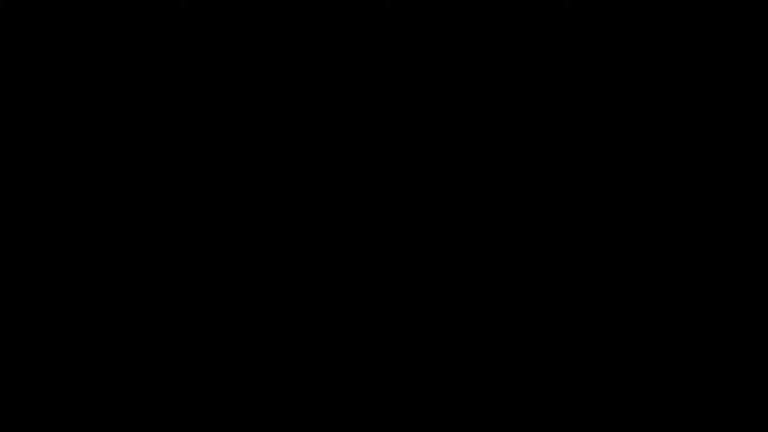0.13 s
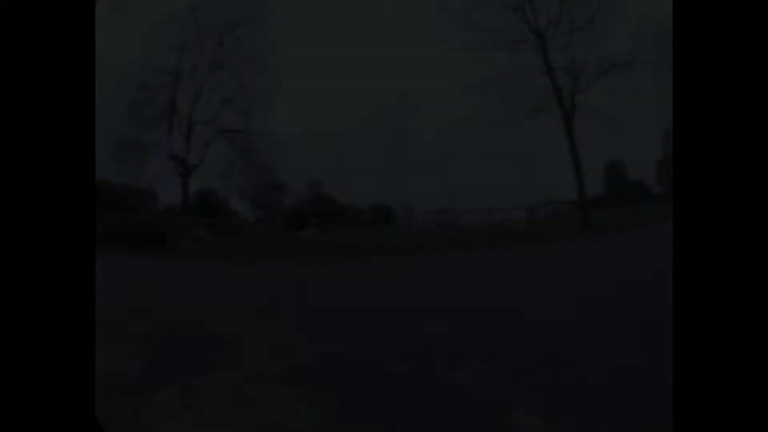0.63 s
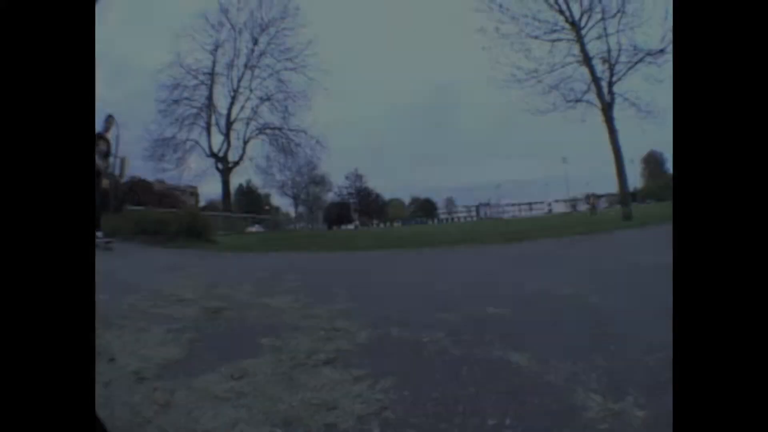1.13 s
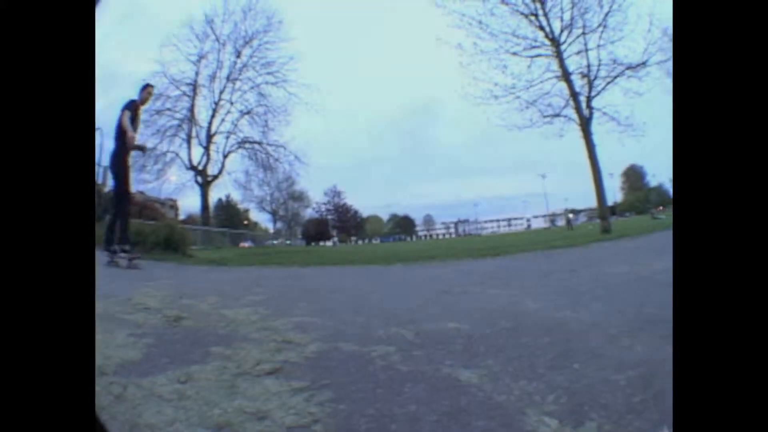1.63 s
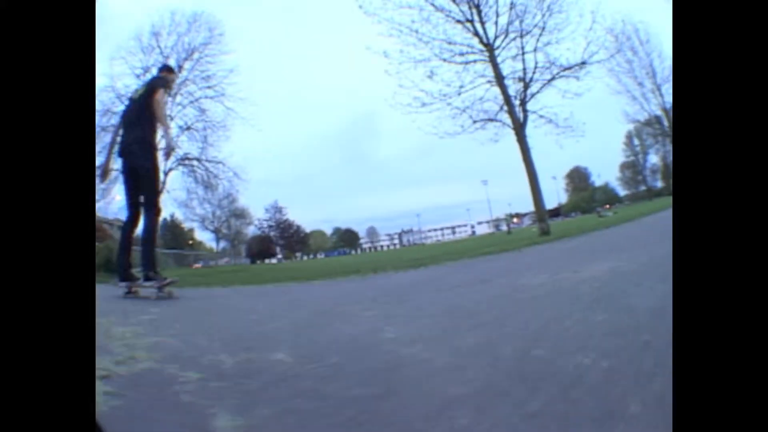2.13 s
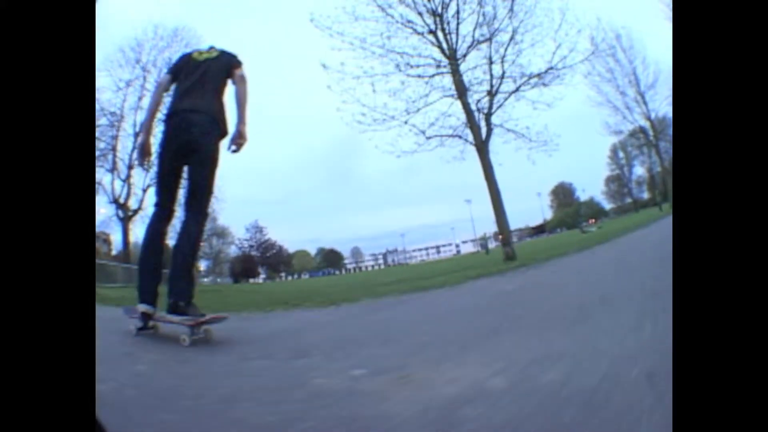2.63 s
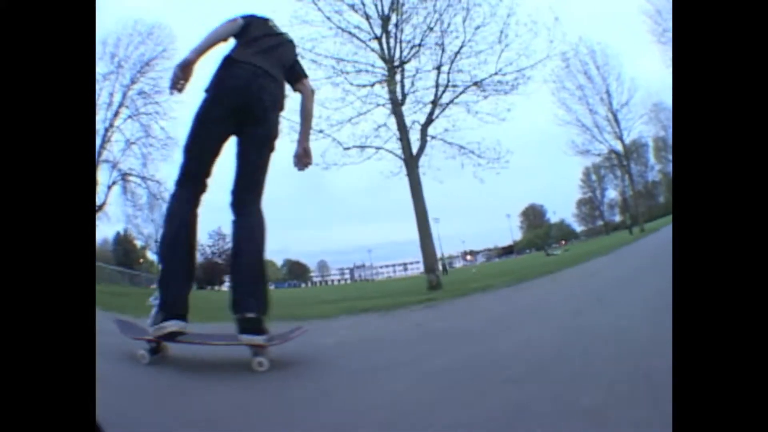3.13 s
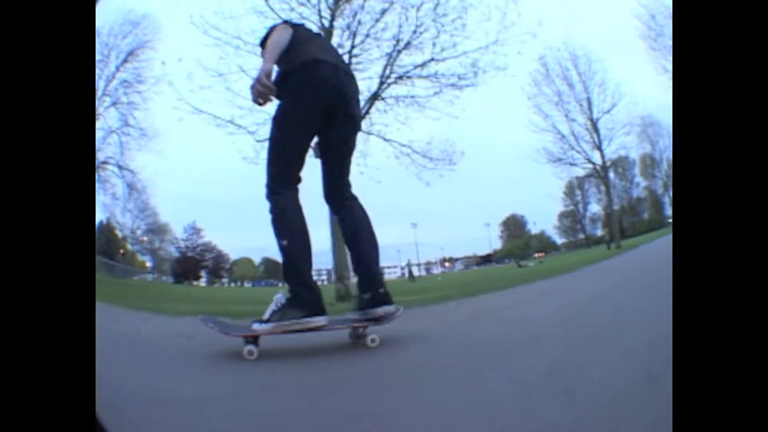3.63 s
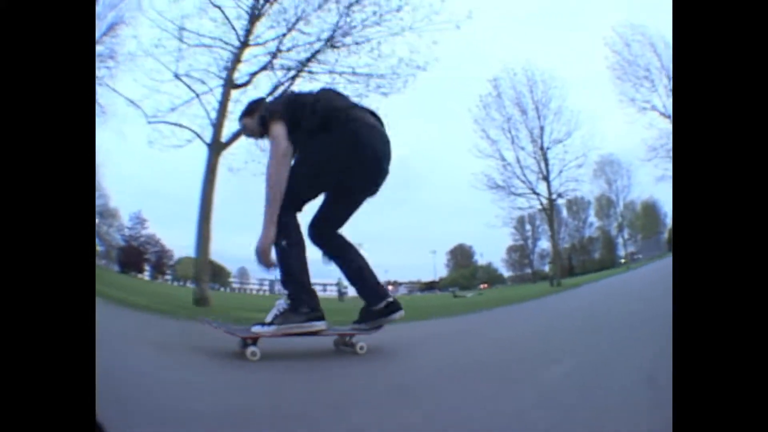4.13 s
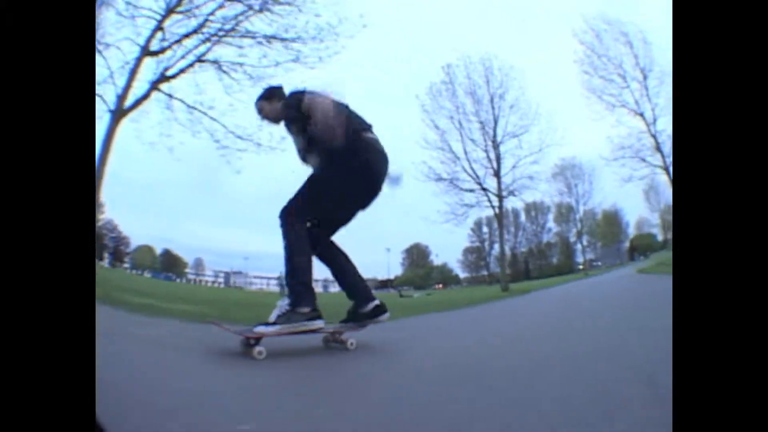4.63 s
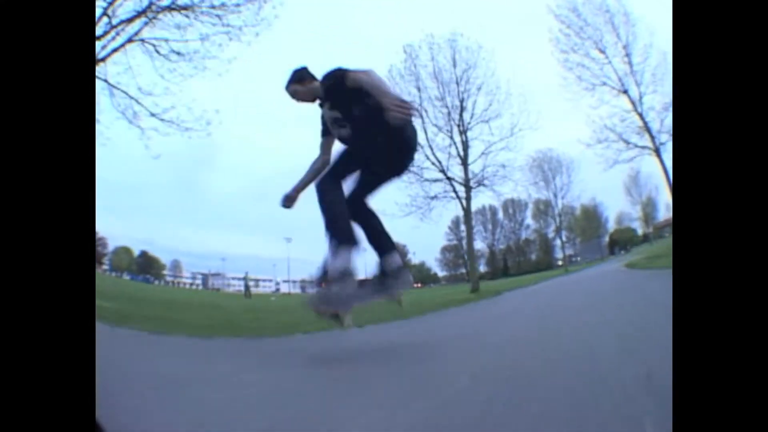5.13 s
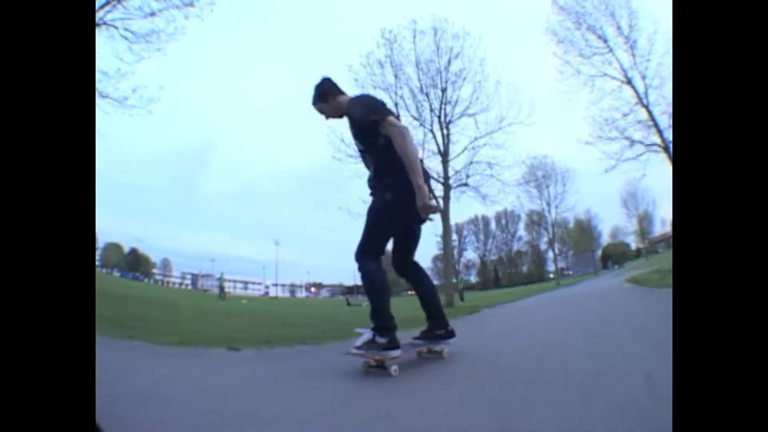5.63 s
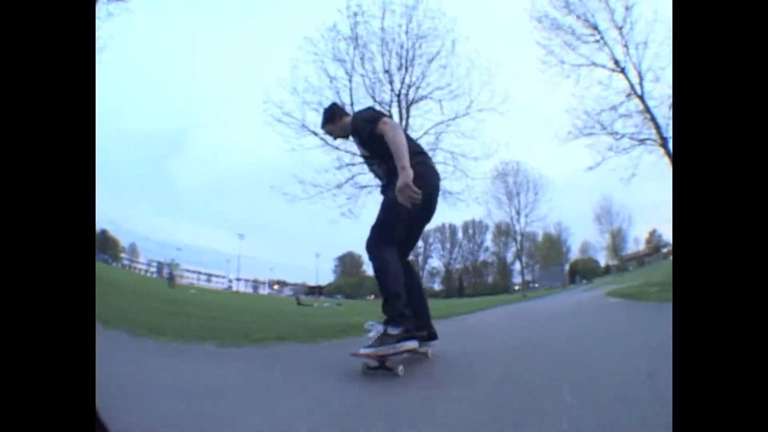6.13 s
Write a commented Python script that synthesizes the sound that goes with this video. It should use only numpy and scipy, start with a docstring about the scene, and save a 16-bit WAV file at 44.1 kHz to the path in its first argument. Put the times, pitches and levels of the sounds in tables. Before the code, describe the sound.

After a short silence, distant traffic fades in outdoors and a skateboard approaches from the left on rough asphalt. Stones tick and knock under its wheels, swelling to a loud, close, hollow rumble with rattling trucks. The tail scrapes and pops sharply; rolling stops during the flight, then a double clack and heavy wooden landing lead into softer rolling. A low stereo microphone stays close, with light wind and rounded loud peaks.

```python
"""On rough asphalt, a skateboard rolls in from the left, pops into the air, lands and rolls on.
Grit under four wheels drives noise bands and ringing filters for deck, trucks and rattle.
Stones, tail and landing are short grainy pushes that ring the same parts; some hits have their own pitch.
Far traffic, a low drone and wind are filtered noise. All begins in silence, and the traffic fades in."""
import sys
import numpy as np
from scipy import signal
from scipy.fft import rfft, irfft
from scipy.io import wavfile
from scipy.ndimage import map_coordinates

SR = 44100
rng = np.random.default_rng(int(sys.argv[2]) if len(sys.argv) > 2 else 0)


def store_pcm(level_fs):
    """Save levels as 16-bit WAV."""
    pcm = np.round(np.clip(level_fs, -1, 1) * 32767).astype(np.int16)
    wavfile.write(sys.argv[1], SR, np.atleast_2d(pcm).T)


def to_linear_factor(level_db):
    """Convert decibel levels (scalar or array-like) to linear amplitude factors."""
    exponent = np.asarray(level_db, float) / 20
    return 10 ** exponent


N = 276066

# Base levels of the board rolling in: [t/s, deck level/dB, low thrum level/dB,
# wheel growl level/dB, rattle level/dB]
ROLL_IN = [(0.5, -110, -90, -119, -131), (0.61, -67, -66, -62, -80), (0.69, -65, -53, -59.5, -66),
           (0.95, -52, -48.5, -50.5, -55.5), (1.14, -53, -43, -45, -49), (1.34, -47, -45.5, -56, -58.5),
           (1.56, -43, -35.5, -42.5, -51.5), (1.7, -50, -47, -35.5, -45.5), (1.78, -35, -27, -35, -46),
           (1.93, -36.5, -31.5, -33, -44), (2.2, -36, -29, -33, -45), (2.81, -35, -26.5, -30, -40),
           (2.92, -15.5, -16, -16.5, -23), (3.031, -17.5, -21.5, -21.5, -26),
           (3.5, -15, -21.5, -26.5, -35.5), (3.68, -20, -21.5, -24, -38.5), (3.88, -20, -25, -30, -41.5),
           (4.21, -18, -21.5, -24.5, -35.5), (4.39, -21, -23, -32, -43), (4.55, -28, -27.5, -28.5, -42),
           (4.76, -35, -34, -43, -48.5)]
# The same columns after the landing
ROLL_AWAY = [(5.322, -27, -34, -28, -33), (5.394, -26.5, -22, -29.5, -42), (5.464, -28, -28, -47, -43.5),
             (5.55, -41, -28.5, -31, -50.5), (5.66, -34, -28, -32, -47), (5.784, -30.5, -28.5, -29.5, -43),
             (5.956, -32, -32, -37.5, -47.5), (6.26, -28, -27.5, -36.5, -43.5)]
# rolling sound is silent between these: tail scrape, pop, flight and first landing touch
ROLL_STOPS_S, ROLL_RESUMES_S = 4.8, 5.31
# Path of the board: [t/s, lead of the left port/samples, spread of that lead over the wheels/samples,
# treble shading between the ports/dB]
PATH = [(.42, 6.04, 0.11, 1.5), (1.4, 5.9, 0.54, 3), (2.0, 5.4, 0.71, 2.5), (2.6, 4.3, 1.1, 3.5),
        (3.2, 3.45, 1.46, 2.5), (3.6, 1.8, 1.1, 2.5), (4.5, 1.1, 2.3, 2), (4.88, 1.4, 1.1, 3.5),
        (5.0, 0.27, 0.94, 1.5), (6.26, 0.066, 0.21, 1)]
# Places of the four wheels along the board: [multiple of the spread]
WHEEL_PLACES = np.array([-1.5, -.5, .5, 1.5])

# Colours of the rolling layers, each scaled to rms 1 when used: [f/Hz, level/dB per Hz]
BOOM_COLOUR = [(80, -37), (115, 5), (140, 10), (175, 10.5), (260, -33)]
THRUM_COLOUR = [(130, -13.5), (200, 1), (260, 4), (330, 4), (420, -2.5), (500, 1), (650, -30)]
GROWL_COLOUR = [(600, -4), (880, 8), (1100, 4.5), (1300, 2.5), (1600, 3.5), (2300, -29.5)]
BUZZ_COLOUR = [(1100, 4), (1600, 19), (1900, 11.5), (2500, -3.5), (3000, 3.5), (4300, -39.5)]
RATTLE_COLOUR = [(2200, 6), (3300, -2.5), (4400, 2), (5300, 1), (5900, 1), (6500, -4.5), (9000, -4.5),
                 (11500, -11.5), (13500, -20.5), (15000, -52)]

# Main bending of the deck as the rider shifts weight: [t/s, f/Hz, width of one filter pass/Hz]
DECK_BEND = [(.42, 690, 300), (2.4, 610, 383), (2.9, 606, 260), (3.08, 625, 199), (3.22, 540, 181),
             (3.34, 600, 204), (3.48, 550, 185), (3.68, 687, 203), (3.8, 656, 201), (3.9, 702, 129),
             (4.15, 670, 171), (4.4, 718, 142), (4.6, 640, 306), (4.75, 630, 353), (5.4, 540, 392),
             (6.26, 600, 403)]
# Upper bending of the deck: [t/s, level against the growl/dB, f/Hz]
UPPER_BEND = [(.42, -16, 1010), (1.6, -13.5, 950), (2.5, -10, 990), (2.75, -13, 880), (2.9, -8.5, 870),
              (3.1, -22, 880), (3.5, -16, 845), (3.68, -10, 860), (3.85, -13, 940), (4.25, -7, 1150),
              (4.38, 1, 1170), (4.5, 1.5, 1240), (4.62, 0, 1140), (4.72, -12, 1100), (5.35, -7, 1050),
              (5.8, -8, 1070), (6.26, -4, 1050)]
UPPER_BEND_WIDTH_HZ = 240   # of one filter pass
# Low boom: [t/s, level against the thrum/dB]
BOOM_LEVEL = [(.42, -5), (1.7, -5.5), (2.7, -8.5), (3.6, -4.5), (4.15, -5), (4.45, -11), (4.7, -12),
              (5.4, -14.5), (6.26, -7.5)]
BUZZ_DB = -8   # truck buzz against the growl
AXLE_HZ, AXLE_WIDTH_HZ = 2155, 190
# Faint ring of the axles: [t/s, level against the growl/dB]
AXLE_LEVEL = [(.42, -23), (3.2, -24), (3.7, -10.5), (4.2, -17), (4.4, -24), (6.26, -28)]
BEARINGS_HZ, BEARINGS_WIDTH_HZ = 5850, 380
# Hiss of the bearings: [t/s, level against the rattle/dB]
BEARINGS_LEVEL = [(.42, -8), (1.7, -8), (2.6, -11), (3.0, -20), (5.6, -20), (5.85, -12), (6.26, -12)]
TOP_HZ = 10500   # corner above which the next table acts
# Boost or cut of the highest rattle: [t/s, level/dB]
TOP_LEVEL = [(.42, -8), (1.3, 1.5), (2.2, -1), (4.2, -1), (4.8, -3), (5.3, -10), (6.26, -10)]
WANDER_DB, WANDER_PER_S = 2, 2.25   # changing asphalt shifts the balance of the layers
BLOWS_PER_S, BLOWS_DB = 110, -3.5   # coarse stones for each wheel; level against the grit
FLASH, FLASH_MS = 0.67, 6.9   # each blow shakes the rattle briefly: share, fall time
CRACKLE_PER_S, CRACKLE_CYCLES, CRACKLE_DB = 260, 6.4, -6   # grains per wheel; level against the rattle

# Stones, pop and first touch of the landing, peaks before panning:
# [t/s, crack level/dB, thud level/dB, snap level/dB]
KNOCKS = [(0.8024, -49, -31, -41), (0.8229, -38, -27, -35), (0.9727, -27, -24.5, -28),
          (1.1518, -39, -28, -43), (1.3157, -28, -24.5, -30), (1.6182, -42, -37, -27),
          (1.6718, -43, -27, -23), (1.954, -21.5, -39, -25), (1.967, -28, -27, -28),
          (1.9875, -21, -17, -28), (2.1252, -23, -26, -25), (2.1405, -22, -4.5, -15),
          (2.278, -22, -13.5, -18), (2.3183, -13, -12, -27), (2.4368, -22, -20, -18),
          (2.5391, -16, -10, -35), (2.6376, -43, -35, -47), (2.6953, -17, -16, -42),
          (2.7285, -11.5, -19, -37), (2.8534, -11, -17, -12), (2.938, -4.5, -25, -28),
          (3.1635, -10.5, -13, -13), (3.2223, -14, -13, -31), (3.267, -12, -33, -28),
          (3.2849, -7, -30, -29), (3.3264, -7, -12, -27), (3.3704, -10, -23, -9.5), (3.418, -18, -8, -8),
          (3.4381, -18, -22, -11.5), (3.4843, -15, -6.5, -14), (3.509, -19.5, -27, -15),
          (3.7868, -10, -8.5, -19), (4.0115, -30, -17, -30), (4.037, -19, -19, -21), (4.1051, -14, -9, -16),
          (4.14, -25, -12, -35), (4.2585, -38, -17, -40), (4.4684, -30, -10, -45), (4.9053, -1, -6, -27),
          (5.213, -3, -12, -11.5), (5.4464, -16, -11, -19), (5.478, -27, -16, -28), (5.522, -30, -29, -36),
          (5.5939, -23, -17, -25), (5.6246, -20.5, -16, -23.5), (5.6793, -27, -20, -28),
          (5.7717, -22, -40, -20), (5.904, -15, -4.5, -22), (5.926, -11.5, -11, -15),
          (6.0926, -30, -20, -32), (6.1, -25, -30, -26), (6.115, -22, -19, -23), (6.152, -23, -26, -24),
          (6.17, -20, -10.5, -18.5), (6.2132, -16, -21, -23)]
KNOCK_CONTACT_MS, KNOCK_T60_MS, KNOCK_THUMP_DB = 0.36, 48.6, -9.5   # all knocks; thump against thud
# Rough patches, tail drag, shoe on grip and landing, peaks before panning: [t/s, contact/ms,
# 60 dB fall of the push/ms, crack level/dB, thump level/dB, thud level/dB, snap level/dB]
GRINDS = [(0.977, 20, 160, -34, -45, -30.5, -30), (1.08, 54, 60, -37, -45, -33, -36.5),
          (1.63, 8.2, 23, -26, -41, -27, -26.5), (1.729, 11, 56, -21.5, -33, -17, -21.5),
          (2.03, 20, 71, -20.5, -23, -17, -26), (2.39, 340, 120, -10.5, -13.5, -8, -16.5),
          (2.742, 72, 410, -14, -9.5, -3, -12.5), (2.772, 27, 130, -3, -34, -37, -9.5),
          (4.742, 14, 67, -28, -20, -18, -28), (4.768, 108, 120, -14.5, -8, -6, -13),
          (4.908, 13.7, 97, -15, -12, -12, -8.5), (4.939, 40, 170, -22.5, -41, -50.5, -19.5),
          (5.22, 13.5, 156, -13.5, -29, -13, -16.5), (5.279, 9.7, 27, -11, -27, -15, -21),
          (5.302, 12.7, 24, -4, -2.5, -7, -7.5), (5.345, 21, 44, -19.5, -17, -27, -20),
          (5.398, 12, 45, -22, -20, -22, -28), (5.415, 21.4, 57, -14, -17, -15.5, -22),
          (5.552, 13, 35, -19, -24, -14, -27), (5.785, 80, 70, -22.5, -25, -25, -26.5),
          (5.991, 28, 40, -16, -34, -14, -18.5)]
# Pitched sounds of stones, tail scrape, pop, landing and rolling, with one faint long shudder in the air,
# peaks before panning: [t/s, level/dB, f/Hz, width/Hz, contact/ms]
PINGS = [(1.14, -28, 735, 150, 14), (1.155, -28, 1050, 150, 10), (1.668, -19.5, 900, 200, 11),
         (1.79, -29, 890, 150, 8), (1.905, -19, 940, 200, 32), (2.64, -20, 900, 400, 2),
         (2.728, -13.5, 1340, 300, 2.2), (1.672, -27, 5960, 900, 2.1), (1.957, -25.5, 6540, 1500, 8),
         (2.106, -33, 3600, 600, 1.5), (2.126, -21, 2470, 300, 12), (2.14, -11.5, 2380, 400, 2),
         (2.138, -6.5, 1160, 320, 4), (2.767, -11, 4400, 800, 30), (2.776, -4, 2470, 800, 36),
         (2.9949, -13, 2500, 900, 1.5), (3.0854, -13, 3000, 1500, 1.5), (3.738, -33, 7800, 2500, 1.5),
         (3.7866, -1.5, 4800, 1090, 0.43), (4.0115, -9.5, 734, 200, 2), (4.015, -23, 2120, 250, 6),
         (4.2585, -14, 710, 250, 1.6), (4.468, -16, 920, 400, 1.5), (3.3705, -6, 650, 249, 2.3),
         (4.0128, -22, 8500, 2000, 4), (4.259, -34, 4300, 1500, 1.5), (4.404, -23, 4200, 1500, 1.55),
         (4.584, -25.5, 8000, 2500, 2.5), (4.59, -24, 4970, 1200, 2.9), (4.637, -21, 7940, 1800, 1.15),
         (4.6915, -24.5, 4980, 3000, 2.6), (4.62, -29, 5000, 1500, 3.3), (4.775, -8, 255, 170, 120),
         (4.9057, 5, 2880, 2180, 0.29), (4.9057, -5, 1287, 110, 3.2), (4.912, -5, 1110, 260, 10),
         (4.921, -9, 1250, 250, 6), (4.908, -14, 467, 90, 15), (4.907, -12, 2190, 250, 6.5),
         (5.07, -33.5, 2170, 1390, 150), (5.222, -15, 1300, 500, 25), (2.772, -8, 3270, 3000, 32),
         (2.765, -8, 900, 450, 35), (5.3025, -8, 260, 160, 15), (5.214, -14, 420, 250, 12),
         (0.8, -36, 690, 160, 50), (5.2137, -9, 2840, 900, 0.52), (5.2135, -9.5, 620, 151, 1.4),
         (5.3015, 1.5, 684, 199, 18.6), (5.302, -8, 430, 149, 16), (5.302, -19.5, 110, 70, 7),
         (5.903, -7.5, 2230, 500, 1), (5.903, -22, 1020, 180, 1.3), (5.926, -14, 1090, 250, 3.6),
         (5.994, -8.5, 946, 130, 16), (6.01, -9, 970, 160, 9.5), (5.993, -20, 2720, 300, 22),
         (6.008, -19, 1760, 250, 15), (6, -19.5, 5030, 900, 24)]
PAN_DB_PER_SAMPLE = 1.6   # hits are louder at the port that leads
# Time when hits come from the right, beside the microphone: [start t/s, end t/s]
RIGHT_SIDE_TIME = (2.1, 2.33)

# Struck deck, low bending: [f/Hz, width/Hz, level/dB]
PLANK_MODES = [(219, 81, 2), (297, 180, 1.5)]
# Struck deck, high bending: [f/Hz, width/Hz, level/dB]
DECK_MODES = [(600, 278, 3.5), (872, 246, 5), (1144, 298, -2.5)]
# Struck trucks: [f/Hz, width/Hz, level/dB]
TRUCK_MODES = [(1380, 500, -3.5), (1887, 480, 3), (2038, 430, 1.5), (2830, 855, -4), (3150, 1280, -8.5)]

# Colour of far traffic, scaled to rms 1 when used: [f/Hz, level/dB per Hz]
TRAFFIC_COLOUR = [(90, -6), (130, 6.5), (250, 2.5), (500, 4), (800, 2.5), (1100, 0), (1600, -12.5),
                  (2600, -17.5), (3600, -24.5), (6000, -25.5), (9000, -32.5), (13000, -47)]
TRAFFIC_DB = -31.5   # once faded in
# Fade-in of the traffic; its first moment ends the silence for all sources: [t/s, level/dB]
FADE = [(.42, -58), (.445, -34), (.55, -24), (1.0, -14), (1.6, -6), (2.2, 0)]
# Colour of the low drone, scaled to rms 1 when used: [f/Hz, level/dB per Hz]
DRONE_COLOUR = [(80, -20), (92, -7), (103, 0), (116, -5), (135, -9), (165, -22)]
# Low drone: [t/s, level/dB]
DRONE_LEVEL = [(.42, -77), (.7, -59), (1.15, -41.5), (1.9, -35), (2.3, -27.5), (2.6, -39), (3.1, -37),
               (3.7, -43.5), (4.7, -37), (5.0, -48.5), (6.26, -40)]
# Wind on the ports, before gusts: [t/s, level/dB]
WIND_LEVEL = [(.42, -76), (.7, -54), (1.2, -49), (2.0, -44.5), (2.8, -36), (3.6, -40.5), (4.6, -40.5),
              (5.3, -44), (6.26, -51)]


def rms_one(x):
    """Scale to unit rms."""
    return x / np.sqrt(np.mean(x ** 2) + 1e-20)


def in_time(rows):
    """Turn table columns into curves over every sample."""
    s, *columns = np.transpose(rows)
    return [np.interp(np.arange(N) / SR, s, c) for c in columns]


def colour(x, spectrum, size=2048):
    """Minimum-phase filter with this spectrum, steep outside it: nothing sounds early; rms 1."""
    (first_hz, first_db), (last_hz, last_db) = spectrum[0], spectrum[-1]
    hz, db = np.transpose([(first_hz / 4, first_db - 30), *spectrum, (last_hz * 4, last_db - 60)])
    grid = np.maximum(np.arange(size // 2 + 1), .5) * SR / size
    log_gain = np.interp(np.log(grid), np.log(hz), db) * np.log(10) / 20
    # folding the cepstrum onto positive times packs the energy at the start
    cepstrum = irfft(log_gain)
    cepstrum[1:size // 2] *= 2
    cepstrum[size // 2 + 1:] = 0
    response = irfft(np.exp(rfft(cepstrum)))
    return rms_one(signal.oaconvolve(x, response[None], axes=-1)[:, :x.shape[1]])


def resonance(hz, width_hz):
    """Two-pole resonance with gain 1 on top."""
    r = np.exp(-np.pi * width_hz / SR)
    return (1 - r * r) / 2 * np.array([1, 0, -1]), [1, -2 * r * np.cos(2 * np.pi * hz / SR), r * r]


def body(x, modes):
    """A struck part: side-by-side resonances with alternating signs."""
    return sum((-1) ** k * to_linear_factor(db) * signal.lfilter(*resonance(hz, width), x)
               for k, (hz, width, db) in enumerate(modes))


def drift(rate, count=1):
    """Smoothed random wander of spread 1, computed at every eighth sample."""
    r = np.exp(-16 * np.pi * rate / SR)
    noise = rng.standard_normal((count, N // 8 + 4001))
    slow = signal.lfilter([1], [1, -2 * r, r * r], noise)[:, 4000:]   # skip the filter's start
    return np.repeat(rms_one(slow), 8, axis=1)[:, :N]


def high_part(x, corner_hz):
    """Gentle high-pass: the treble of a sound."""
    return signal.sosfilt(signal.butter(1, corner_hz, "high", fs=SR, output="sos"), x)


def roll(low_db=0.61, mid_db=1.43):
    """Four wheels reach two ports, each with its own lag; level differences in dB per sample of lead."""
    quiet = [[s] + [-90] * 4 for s in (FADE[0][0], ROLL_STOPS_S, ROLL_RESUMES_S)]
    deck_db, thrum_db, growl_db, rattle_db = in_time([quiet[0], *ROLL_IN, *quiet[1:], *ROLL_AWAY])
    wander_db = WANDER_DB * drift(WANDER_PER_S, count=2)
    lead, spread, shading_db = in_time(PATH)
    # bumps shake all wheels, jolts shake one, chatter passes quick blows through the whole board
    shakes = drift(23.0), drift(22.0, count=4), drift(77)
    coarse, fine = grit(2500, spread_db=4.0), grit(3500, spread_db=4.5)
    blows = rms_one(np.abs(grit(BLOWS_PER_S, spread_db=1.6)))   # coarse stones all push the same way
    coarse = rms_one(coarse) + to_linear_factor(BLOWS_DB) * blows
    flashes = rms_one(signal.lfilter([1], [1, -np.exp(-1000 / (FLASH_MS * SR))], blows))
    fine = rms_one(fine) * (1 + FLASH * flashes)
    low = deck_rumble(coarse, blows, deck_db, thrum_db, wander_db[0], shakes)
    mid = truck_growl(coarse, growl_db, wander_db[1], shakes)
    rattle = loose_rattle(fine, rattle_db, shakes)
    out = np.zeros((2, N))
    for port, side in enumerate((.5, -.5)):
        mix = low * to_linear_factor(side * low_db * lead) + mid * to_linear_factor(side * mid_db * lead)
        mix = mix + shade(rattle, side * shading_db)
        for wheel, place in zip(mix, WHEEL_PLACES):
            read_at = np.arange(N) + side * (lead + spread * place)
            out[port] += map_coordinates(wheel, [read_at], order=3, mode="nearest") / 2
    return out


def grit(per_s, spread_db):
    """Each wheel meets stones at random, with sizes drawn from an exponential spread in dB."""
    sizes = to_linear_factor(spread_db * np.minimum(rng.exponential(1, (4, N)), 4)) * rng.choice([-1, 1], (4, N))
    return sizes * (rng.random((4, N)) < per_s / SR) + 1e-18


def deck_rumble(coarse, blows, deck_db, thrum_db, wander_db, shakes):
    """Grit pushes the deck: a boom, a thrum and the main bending ring."""
    bumps, jolts, chatter = shakes
    boom_db = thrum_db + in_time(BOOM_LEVEL)[0] + wander_db
    low = to_linear_factor(boom_db) * colour(coarse, BOOM_COLOUR, size=4096)
    low = low + to_linear_factor(thrum_db + 2.0 * bumps) * colour(coarse, THRUM_COLOUR)
    push = rms_one(grit(2500, spread_db=3.5)) + to_linear_factor(BLOWS_DB) * blows
    ring = deck_ring(push, *in_time(DECK_BEND))
    return low + to_linear_factor(deck_db + 1.16 * chatter + 0.4 * bumps + 0.5 * jolts) * ring


def deck_ring(x, ring_hz, width_hz, size=512):
    """A bending mode, applied twice for steep flanks, block by block as its pitch moves."""
    out, state = x.copy(), np.zeros((2, len(x), 2))
    for i in range(0, N, size):
        block = slice(i, i + size)
        filter_now = resonance(ring_hz[i], max(width_hz[i], 30))
        for turn in range(2):
            out[:, block], state[turn] = signal.lfilter(*filter_now, out[:, block], zi=state[turn])
    return rms_one(out)


def truck_growl(coarse, growl_db, wander_db, shakes):
    """Grit drives wheel growl, truck buzz, upper deck bending and axle ring; lone stones tick."""
    bumps, jolts, chatter = shakes
    buzz_db = growl_db + BUZZ_DB + wander_db
    bend_db, bend_hz = in_time(UPPER_BEND)
    mid = to_linear_factor(growl_db + 1.5 * chatter + 0.87 * bumps + 2.0 * jolts) * colour(coarse, GROWL_COLOUR)
    mid = mid + to_linear_factor(buzz_db + 2.4 * chatter + 1.4 * bumps + 1.2 * jolts) * colour(coarse, BUZZ_COLOUR)
    bend = deck_ring(coarse, bend_hz, np.full(N, UPPER_BEND_WIDTH_HZ))
    mid = mid + to_linear_factor(growl_db + bend_db + 0.83 * bumps + 1.4 * chatter) * bend
    axle = rms_one(body(coarse, [(AXLE_HZ, AXLE_WIDTH_HZ, 0)]))
    mid = mid + to_linear_factor(growl_db + in_time(AXLE_LEVEL)[0] + 2.0 * chatter) * axle
    stones = signal.lfilter([1], [1, -.6], grit(24, spread_db=-4.0))   # lone stones tick in the trucks
    return mid + to_linear_factor(buzz_db - 15) * rms_one(body(stones, TRUCK_MODES))


def loose_rattle(fine, rattle_db, shakes):
    """Fine grit rattles the trucks, joined by crackle and the narrow hiss of the bearings."""
    bumps, jolts, chatter = shakes
    rattle = to_linear_factor(rattle_db + 1.84 * chatter + 0.6 * bumps + 1.8 * jolts) * colour(fine, RATTLE_COLOUR)
    rattle = rattle + to_linear_factor(rattle_db + CRACKLE_DB) * crackle()
    hiss = rms_one(body(fine, [(BEARINGS_HZ, BEARINGS_WIDTH_HZ, 0)]))
    rattle = rattle + to_linear_factor(rattle_db + in_time(BEARINGS_LEVEL)[0]) * hiss
    return rattle + (to_linear_factor(in_time(TOP_LEVEL)[0]) - 1) * high_part(rattle, TOP_HZ)


def crackle(low_hz=1500, high_hz=9000, tilt_db=-3.5, count=10):
    """Crushed grit snaps in clumps, dealt to short rings spread in pitch; tilt in dB per octave."""
    snaps = grit(CRACKLE_PER_S, spread_db=7.5) * to_linear_factor(0.87 * drift(31.0))
    dealt = rng.integers(0, count, (4, N))
    total = 0
    for k, hz in enumerate(np.geomspace(low_hz, high_hz, count)):
        mode = (hz, 1.6 * hz / CRACKLE_CYCLES, tilt_db * np.log2(hz / low_hz))
        total = total + body(snaps * (dealt == k) + 1e-18, [mode])
    return rms_one(total)


def shade(x, db, top_share=3.17, corner_hz=7000):
    """The housing shades a port from the far side, more so in the top octave."""
    return to_linear_factor(db) * (x + (to_linear_factor(top_share * db) - 1) * high_part(x, corner_hz))


def hits():
    """Short knocks and long grinds, each placed where the board is."""
    pan = PAN_DB_PER_SAMPLE * hit_lead()
    short = [(s, crack, thud + KNOCK_THUMP_DB, thud, snap, pan[int(s * SR)], KNOCK_CONTACT_MS, KNOCK_T60_MS)
             for s, crack, thud, snap in KNOCKS]
    long = [(s, crack, thump, thud, snap, pan[int(s * SR)], contact, t60)
            for s, contact, t60, crack, thump, thud, snap in GRINDS]
    return (knocks(short, first_touch=10.3, rise=0.099, grain_db=0.0)
            + knocks(long, first_touch=0.26, rise=0.76, grain_db=2.5))


def knocks(table, first_touch, rise, grain_db, low_pan=0.18, apart=1.0, snap_touch=1.0,
           snap_fall=0.13, snap_pan=1.46, size=7000):
    """A first touch, a grainy contact, then a fast fall; deck, trucks and snap ring together."""
    out, ms = np.zeros((2, N + size + 20)), np.arange(size) / SR * 1000
    grain_size = to_linear_factor(grain_db * rng.standard_normal((len(table), 1, size // 140)).repeat(140, axis=2))
    grain = rng.standard_normal((len(table), 3, size)) * grain_size
    for (s, crack_db, thump_db, thud_db, snap_db, pan_db, contact, t60), noise in zip(table, grain):
        fall_db = -60 * np.maximum(ms - contact, 0)
        push = to_linear_factor(fall_db / max(t60, 3)) * noise
        push *= np.clip(0.46 + (contact < 20) + ms / (rise * contact), 0, 1)   # long contacts swell
        push[0, 0] = first_touch
        thump, thud, crack = (peak_one(body(push[0], modes))
                              for modes in (PLANK_MODES, DECK_MODES, TRUCK_MODES))
        push[0, 0] *= snap_touch   # share of the first touch passed to the treble
        # the treble dies sooner, and has noise of its own at each port
        snap_push = (push[0] + apart * push[1:]) * to_linear_factor(snap_fall * fall_db / max(t60, 3))
        snap = colour(snap_push, RATTLE_COLOUR)
        for port, side in enumerate((.5, -.5)):
            at = round(s * SR - side * np.clip(pan_db, -6, 6))   # one sample of lead per dB
            low = to_linear_factor(thump_db) * thump + to_linear_factor(thud_db) * thud
            snap_level = to_linear_factor(snap_db + side * (snap_pan - 1.5) * pan_db)
            high = to_linear_factor(crack_db) * crack + snap_level * peak_one(snap[port])
            out[port, at:at + size] += to_linear_factor(side * low_pan * pan_db) * low + to_linear_factor(side * pan_db) * high
    return out[:, :N]


def peak_one(x):
    """Scale to a peak of 1."""
    return x / np.abs(x).max()


def pings(size=7000):
    """A swelling and fading grainy contact drives one pitch through two resonances in a row."""
    out, ms, lead = np.zeros((2, N + size + 20)), np.arange(size) / SR * 1000, hit_lead()
    for (s, db, hz, width, contact), noise in zip(PINGS, rng.standard_normal((len(PINGS), size))):
        swell = np.sqrt(np.sin(np.pi * np.clip((ms + 0.025) / contact, 0, 1)) ** 2)
        sound = peak_one(body(body(noise * swell, [(hz, width, 0)]), [(hz, 3 * width, 0)]))
        lead_now = lead[int(s * SR)]
        pan_db = PAN_DB_PER_SAMPLE * lead_now * min(hz / 2000, 1)   # low pitches differ less
        for port, side in enumerate((.5, -.5)):
            at = round(s * SR - side * lead_now)
            out[port, at:at + size] += to_linear_factor(db + side * pan_db) * sound
    return out[:, :N]


def hit_lead(right_lead=-2.8):
    """Lead of the left port, in samples, for a hit at each moment."""
    s = np.arange(N) / SR
    on_right = (s > RIGHT_SIDE_TIME[0]) & (s < RIGHT_SIDE_TIME[1])
    return np.where(on_right, right_lead, in_time(PATH)[0])


def surroundings():
    """The background at both ports: traffic, drone and wind."""
    return traffic() + drone() + wind()


def traffic(apart=0.067):
    """Far traffic is coloured noise, nearly the same at both ports, with a fluttering level."""
    noise = rng.standard_normal((3, N))
    level_db = TRAFFIC_DB + in_time(FADE)[0] + .8 * drift(25)
    return colour(noise[0] + apart * noise[1:], TRAFFIC_COLOUR) * to_linear_factor(level_db)


def drone():
    """The low drone is a narrow band of noise common to both ports."""
    noise = rng.standard_normal((1, N))
    return colour(noise, DRONE_COLOUR, size=8192) * to_linear_factor(in_time(DRONE_LEVEL)[0])


def wind(apart=0.71):
    """Wind is lumpy low noise, partly own to each port and stronger on the left."""
    level_db = in_time(WIND_LEVEL)[0] + 1.4 * drift(8.1)   # gusts
    noise = rng.standard_normal((3, N))
    spectrum = [(12, 10), (30, 0.0), (60, 11), (85, 9.0), (130, -31)]   # f/Hz, level/dB per Hz
    return colour(noise[0] + apart * noise[1:], spectrum, size=8192) * to_linear_factor(level_db + [[1.5], [-1.5]])


def scene():
    """Add all sources; silence before the first moment of FADE."""
    return (roll() + hits() + pings() + surroundings()) * (np.arange(N) > FADE[0][0] * SR)


def top_cut(x):
    """Nothing passes above the cut-off."""
    return signal.sosfilt(signal.butter(12, 15480, fs=SR, output="sos"), x)


def record(dry, knee_db=-9, release_db_s=150, top=0.67, cut_hz=14200):
    """Gain control ducks after loud peaks and recovers; peaks are rounded and the top is cut."""
    ramp = release_db_s * np.arange(N) / SR
    over = np.maximum(20 * np.log10(np.abs(dry).max(axis=0) + 1e-9) - knee_db, 0)
    held = np.maximum.accumulate(over + ramp) - ramp   # jumps up at once, falls at a steady pace
    duck = signal.lfilter([.004], [1, -.996], held)   # smoothed over a few milliseconds
    rounded = top * np.tanh(dry * to_linear_factor(-.6 * duck) / top)
    mix = signal.sosfilt(signal.butter(12, cut_hz, fs=SR, output="sos"), rounded)
    return top_cut(mix)


dry = scene()
out = record(dry)
store_pcm(out)
```